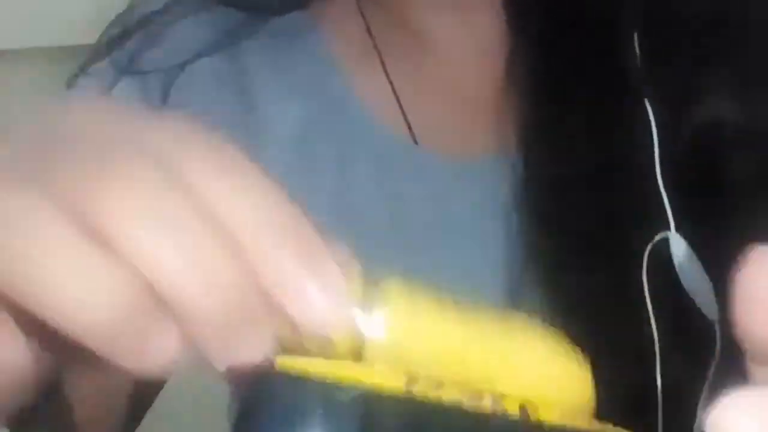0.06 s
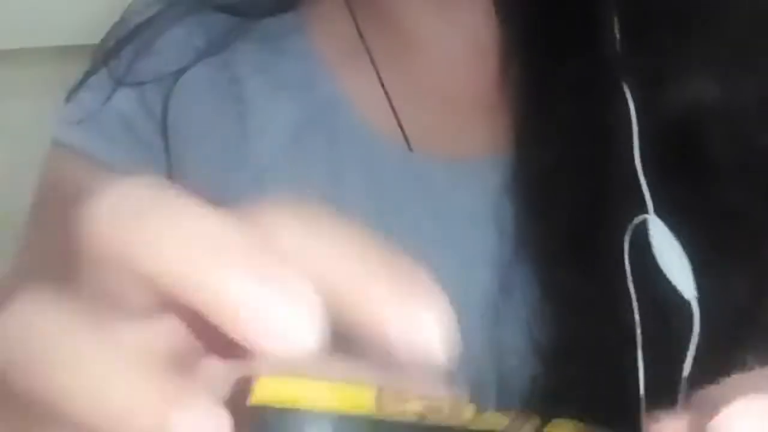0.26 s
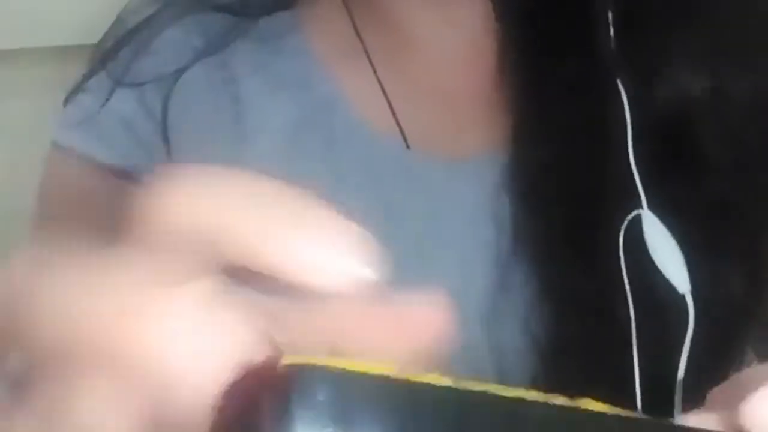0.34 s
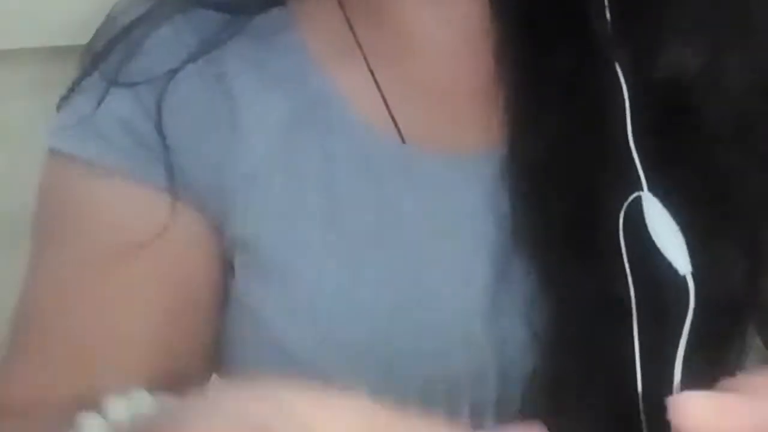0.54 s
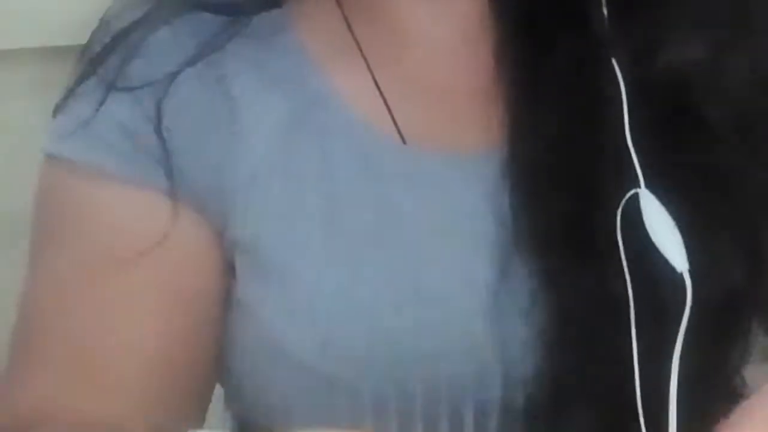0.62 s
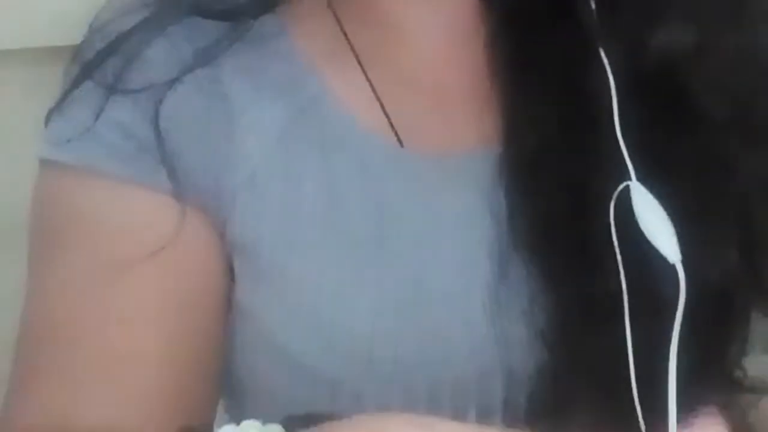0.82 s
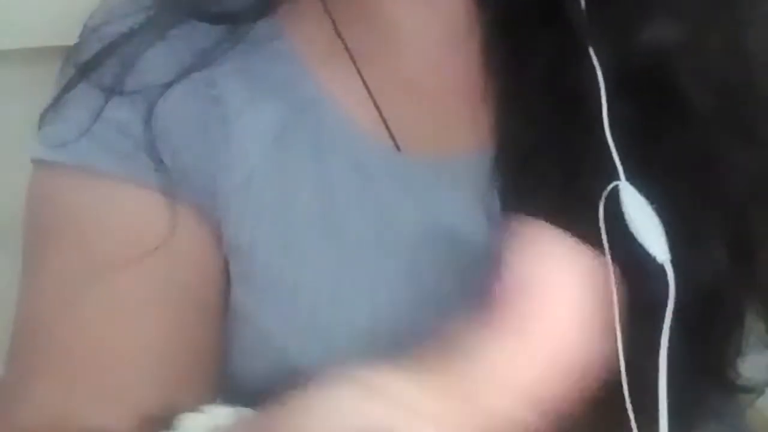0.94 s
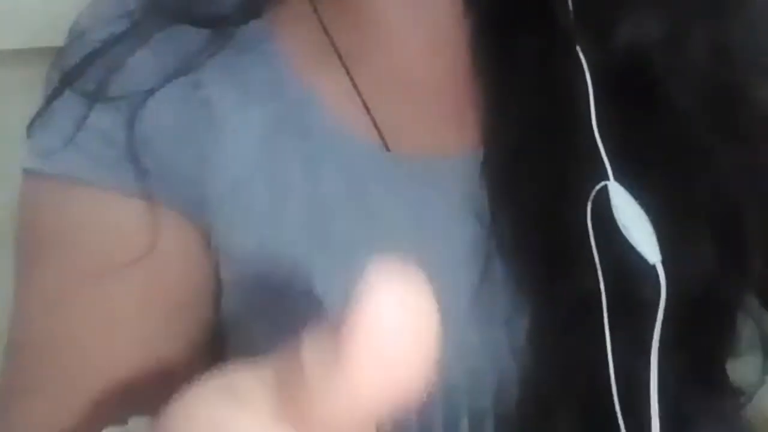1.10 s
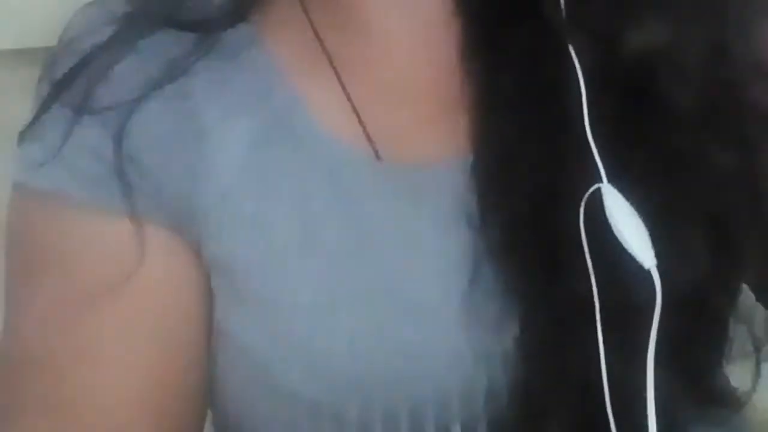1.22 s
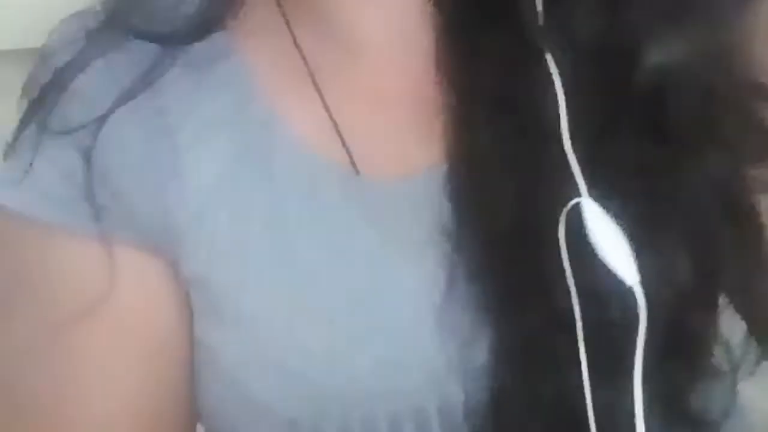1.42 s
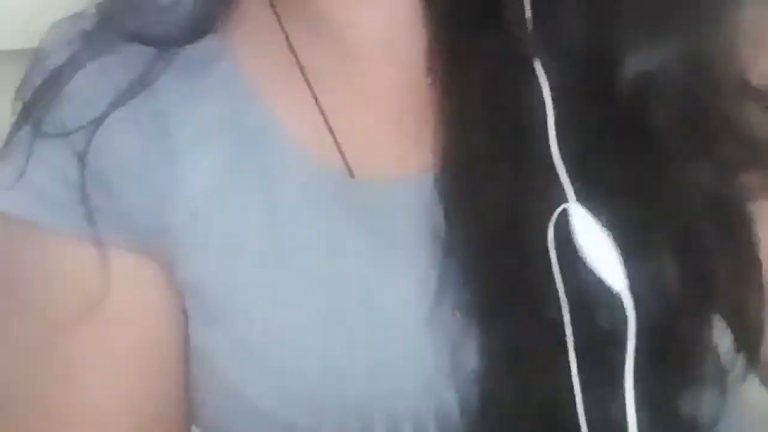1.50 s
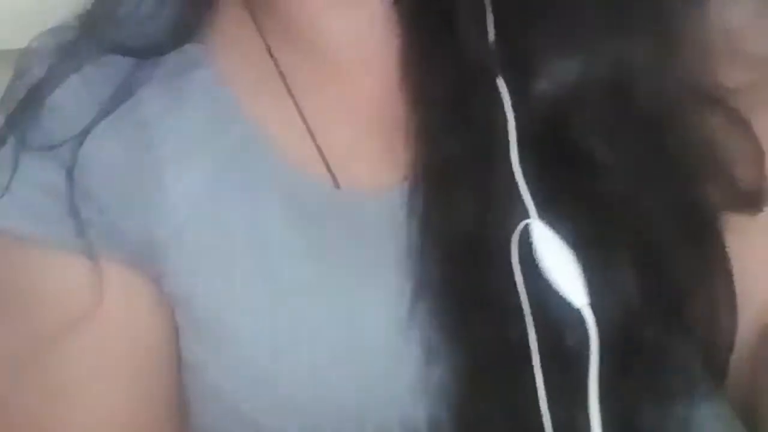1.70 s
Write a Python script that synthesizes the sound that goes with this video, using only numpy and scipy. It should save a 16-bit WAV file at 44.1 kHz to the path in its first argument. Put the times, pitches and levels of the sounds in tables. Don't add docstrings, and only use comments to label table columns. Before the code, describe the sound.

Light plastic tubes being set down and shuffled, with sharp clacks, small ticks and faint rubbing

```python
import sys
import numpy as np
from scipy import signal
from scipy.fft import rfft, irfft
from scipy.io import wavfile
from scipy.ndimage import uniform_filter1d

SR = 44100
rng = np.random.default_rng(int(sys.argv[2]) if len(sys.argv) > 2 else 0)


def attenuation_scalar(level_db):
    decades = np.asarray(level_db, float) / 20
    return 10 ** decades


def output_pcm(signal):
    pcm = np.clip(np.atleast_2d(signal).T, -1, 1) * 32767
    wavfile.write(sys.argv[1], SR, np.round(pcm).astype(np.int16))


N = 77175

# frequency in Hz, rms level in dB.
HUM = [(50, -63.5), (100, -71), (150, -72.5)]
# frequency in Hz, density in dB per Hz.
HISS_COLOUR = [(75, 6), (120, -1.5), (250, -0.5), (550, -7), (1000, -4.5), (1900, -18), (9000, -26),
               (15700, -34), (16100, -55)]
HISS_DB = -61.5

# delay in seconds, level in dB.
ECHOES = [
    (.0045, -19),
    (.016, -43),
    (.022, -23.5),
    (.031, -30),
]
# frequency in Hz, decay by 60 dB in seconds.
ROOM_T60 = [(200, 0.29), (600, 0.18), (1400, 0.22), (3700, 0.35), (9700, 0.33)]
# frequency in Hz, level in dB.
ROOM_COLOUR = [(200, -3), (900, 3.5), (2000, -5), (3200, -9.5), (6000, -6.5), (8000, -7.5), (14000, -13)]
ROOM_DB, ROOM_RISE_S = -13.5, 0.013

# time in seconds, level in dB.
FINGER_EFFORT = [(0, -75), (.24, -88), (.28, -55.5), (.4, -48.5), (.55, -93), (0.628, -56), (.67, -47.5),
                 (.76, -46.5), (.81, -47.5), (.97, -49), (1.2, -60), (1.428, -68), (1.465, -46.5),
                 (1.5, -56), (1.6, -61.5), (1.69, -66), (1.72, -53), (1.75, -55)]
# frequency in Hz, density in dB per Hz.
FINGER_COLOUR = [(150, -43), (500, -6), (900, -0.5), (1350, -2), (1900, -7), (2400, -9), (4500, -16),
                 (16000, -47)]
# time in seconds, level in dB.
SLIDE_EFFORT = [
    (0, -43.5),
    (.03, -48),
    (.066, -43.5),
    (.085, -52.5),
    (.098, -47.5),
    (.106, -60.5),
    (.14, -67),
]
# frequency in Hz, density in dB per Hz.
SLIDE_COLOUR = [(150, -20), (330, -7.5), (700, -11.5), (1300, 2), (1850, -4), (2400, -17), (3100, -14),
                (16000, -50.5)]
SLIPS_PER_S, SLIP_SPREAD_DB = 6000, 2.5

# start in seconds, level in dB, frequency in Hz.
THUMPS = [(0.2307, -24.5, 249), (0.244, -22.5, 164), (.258, -41, 210), (.272, -28, 190), (.285, -30, 172),
          (0.33, -40, 220), (.335, -35.5, 154), (1.29, -46, 170), (.420, -42, 170), (.465, -31, 360),
          (0.824, -37.5, 328), (.859, -25.5, 290), (1.492, -47, 139), (1.712, -42, 277)]
# frequency in Hz, density in dB per Hz.
RATTLE_COLOUR = [(60, -38), (150, 4.5), (300, 13), (600, 7), (1200, -36)]
THUMP_T60_S, RATTLE_DB, RATTLE_T60_S = 0.05, -12, 0.083

# start in seconds, level in dB, frequency in Hz, decay by 60 dB in seconds.
PINGS = [(.2445, -31.5, 2860, 0.0097), (.254, -36.5, 3800, 0.013), (.260, -37, 3770, .008),
         (.272, -36.5, 3350, 0.013), (.272, -43, 5030, .01), (.319, -24.5, 3810, 0.0096),
         (.319, -22, 2720, 0.0058), (.335, -33, 3020, 0.011), (.412, -23.5, 1276, 0.025),
         (.412, -31.5, 4720, 0.0077), (.413, -39, 2880, 0.013), (.465, -21, 5090, 0.0083),
         (.465, -20.5, 6350, 0.0031), (.4655, -20, 1333, 0.026), (.466, -26.5, 2915, 0.014),
         (.480, -32, 3220, 0.011), (.574, -40, 5130, 0.0099), (.595, -34.5, 5150, 0.01),
         (.695, -19, 3240, 0.016), (.708, -28.5, 880, 0.018), (.7135, -24, 980, 0.017),
         (.716, -30, 1810, 0.017), (.720, -26.5, 1210, 0.014), (.730, -32, 1090, 0.013),
         (.739, -30, 1520, 0.016), (.751, -45, 1200, 0.023), (.787, -32, 1290, 0.018),
         (.823, -17, 5040, .008), (.823, -18, 2370, 0.016), (.823, -37, 6410, 0.0072),
         (.843, -21.5, 1160, 0.032), (.8597, -12, 4270, 0.01), (.859, -14, 2750, .012),
         (.8594, -15, 4950, 0.0083), (.859, -19, 10550, 0.01), (.859, -26, 6500, 0.0052),
         (.882, -31, 5100, .015), (.893, -28, 5500, 0.005), (1.0692, -13, 2540, 0.011),
         (1.0715, -22, 5560, 0.016), (1.0695, -30, 8750, 0.01), (1.103, -27.5, 1013, 0.028),
         (1.4435, -31, 3250, .011), (1.4435, -35.5, 4300, 0.011), (1.447, -44, 670, 0.058),
         (1.461, -40, 1200, 0.017), (1.465, -33.5, 1470, 0.016), (1.475, -41, 1980, 0.017),
         (1.496, -44, 2000, 0.022), (1.719, -49, 2360, 0.044)]
# start in seconds, level in dB,
# frequency in Hz, decay by 60 dB in seconds.
FURTHER_MODES = [(.2445, -41, 2050, 0.037), (.3193, -19, 1497, 0.01), (.468, -34.5, 700, 0.049),
                 (.695, -17.5, 1900, 0.016), (.823, -8.5, 1590, 0.01), (.8598, -13.5, 1460, 0.0089),
                 (.863, -19.5, 900, 0.011), (.893, -30, 1200, 0.0093), (1.0692, -9.5, 3460, 0.0086),
                 (1.072, -23.5, 6560, 0.011), (1.092, -31, 790, 0.13), (1.138, -35.5, 790, 0.11),
                 (1.4435, -29.5, 1650, 0.014), (.576, -45, 780, 0.073), (1.478, -42, 3300, 0.011),
                 (.5945, -41, 3000, .012), (.5745, -42, 2340, .008), (.539, -43, 3300, .01),
                 (.648, -33, 580, 0.016), (1.0485, -19.5, 2500, 0.0088)]
PING_ROOM_DB = -4

# start in seconds, peak level in dB, wall mode in Hz, hollow body
# relative level in half dB, crack relative level in half dB.
KNOCKS = [(0.2439, -22, 1340, -7, -23.5), (.319, -18.5, 1120, -19, -13.5), (0.412, -25.5, 1253, -12, -12),
          (0.4646, -21.5, 1305, 4, -5), (0.573, -27, 1124, -10, -17), (0.5949, -30, 1160, -9, -12),
          (.651, -24, 800, -11, -17), (0.654, -21, 1298, -37, -21.5), (0.6952, -13.5, 1260, -15.5, -13),
          (.779, -28.5, 1220, 6.5, -22), (0.823, -8.5, 1163, -12, -12.5), (0.8587, -14, 553, -50, 7.5),
          (0.8925, -25.5, 1030, -27, 3), (.995, -28.5, 667, -18, -19), (1.048, -19, 1504, -5, -17),
          (1.0694, -26, 980, -46, 12), (1.0712, -10, 1025, -38, -28), (1.4435, -30, 1390, -8, -12),
          (1.7, -40.5, 1010, -37, -7), (1.703, -30, 956, -17, -36), (1.713, -33.5, 1030, -28, -40),
          (0.334, -39, 1040, -12, -5), (.821, -19, 1010, -14, -39)]
# start in seconds, peak level in dB, wall mode in Hz, hollow body relative level in half dB, crack relative
# level in half dB.
MORE_KNOCKS = [(.254, -28, 1240, -5, -13), (.260, -28, 1240, -20, -16), (.271, -26, 1166, -66, -19),
               (.343, -29, 1020, -1, -10), (.480, -22.5, 1040, -49, -18.5), (.534, -37.5, 1230, -39, -7),
               (.539, -38, 1250, -16, -7.5), (.639, -35, 1010, -8, -13), (.663, -23, 1196, -9, -23),
               (.691, -25.5, 1017, -28, -9.5), (0.808, -47, 1220, -32, 11), (.953, -32.5, 670, -13, -25.5),
               (1.010, -28.5, 650, -16, -15), (1.030, -30, 860, -20, -13), (1.055, -23, 2310, -19, -16),
               (1.0817, -20, 1084, -15, -28), (1.0789, -24.5, 2840, -26, -3), (1.090, -17.5, 810, -39, -28),
               (1.227, -50.5, 670, -26, -26.5), (1.253, -36.5, 780, -42, -37), (1.278, -42.5, 1008, -40, -20),
               (1.342, -59.5, 940, -28, 13), (1.569, -45.5, 700, -29, -14), (1.588, -45.5, 2080, -12, -12),
               (1.719, -38, 1134, -21, -18)]
# frequency in Hz, density in dB per Hz.
CRACK_COLOUR = [(500, -7), (1800, 3), (3000, 3.5), (5000, -4.5), (7500, -12.5), (10500, -16), (14000, -20),
                (17000, -32)]
# frequency in Hz, level in dB.
SHELL_MODES = [(2600, -5), (3400, -0.5), (4500, -5.5), (5200, -16), (6700, -7.5), (10600, -26)]
CONTACT_S = 0.00058
SHELL_T60_S, SHELL_SCATTER_DB = 0.0058, 0.5
WALL_DB, WALL_T60_S = 2, 0.018
BODY_HZ, BODY_T60_S = 670, 0.018
CRACK_DB, CRACK_ROOM_DB = -2, 1.5
SNAP_T60_S, LINGER_DB, LINGER_T60_S = 0.012, -8, 0.03
TILT_PER_DB, DULL_RISE = 0.1964, 0.038

LOW_CUT_HZ, EDGE_HZ = 179, 16550


def evened(x):
    return x / np.sqrt(np.mean(x ** 2) + 1e-20)


def read(points, hz):
    f, value = np.transpose(points)
    return np.interp(np.log(hz + 1), np.log(f + 1), value)


def add(mix, s, sound):
    part = mix[round(s * SR):][:len(sound)]
    part += sound[:len(part)]


def ring(hz, t60, t):
    return np.sin(2 * np.pi * hz * t) * attenuation_scalar(-60 * t / t60)


def coloured(x, points):
    gain = attenuation_scalar(read(points, np.fft.rfftfreq(len(x), 1 / SR)))
    return irfft(rfft(x) * gain, len(x))


def floor():
    t = np.arange(N) / SR
    hum = sum(attenuation_scalar(db) * np.sqrt(2) * np.sin(2 * np.pi * hz * t + 6 * rng.random()) for hz, db in HUM)
    rumble_cut = signal.butter(3, 75, "high", fs=SR, output="sos")
    hiss = signal.sosfilt(rumble_cut, rng.standard_normal(N))
    return hum + attenuation_scalar(HISS_DB) * evened(coloured(hiss, HISS_COLOUR))


def room(x):
    taps = np.zeros(SR // 2)
    at = np.arange(100, len(taps) - 20, 20)
    at = at + rng.integers(0, 20, len(at))
    taps[at] = rng.choice([-1., 1.], len(at))
    hz, t, z = signal.stft(taps, SR, nperseg=256)
    decay_db = -60 * t / read(ROOM_T60, hz)[:, None]
    z = z * attenuation_scalar(read(ROOM_COLOUR, hz)[:, None] + decay_db)
    tail = signal.istft(z, SR, nperseg=256)[1]
    tail = tail * np.minimum(np.arange(len(tail)) / SR / ROOM_RISE_S, 1) ** 2
    tail = attenuation_scalar(ROOM_DB) * tail / np.linalg.norm(tail)
    for s, db in ECHOES:
        add(tail, s, attenuation_scalar(db) * np.array([0.25, 0.5, 0.25]))
    return signal.fftconvolve(x, tail)[:N]


def rub(effort, colour):
    strength = attenuation_scalar(SLIP_SPREAD_DB * np.minimum(rng.exponential(1, N), 3))
    slips = strength * (rng.random(N) < SLIPS_PER_S / SR) * rng.choice([-1., 1.], N)
    lumps = attenuation_scalar(0.65 * evened(uniform_filter1d(rng.standard_normal(N), size=200)))
    slips = evened(lumps * coloured(slips, colour))
    s, db = np.transpose(effort)
    return slips * attenuation_scalar(np.interp(np.arange(N) / SR, s, db, right=-99))


def thump(db, hz):
    t = np.arange(6000) / SR
    rattle = evened(coloured(rng.standard_normal(len(t)), RATTLE_COLOUR))
    rattle = attenuation_scalar(RATTLE_DB - 60 * t / RATTLE_T60_S) * rattle
    rise = np.minimum(t / 0.0009, 1)
    return attenuation_scalar(db) * (ring(hz, THUMP_T60_S, t) + rattle) * rise


def ping(db, hz, t60):
    t = np.arange(6000) / SR
    mode = attenuation_scalar(db) * ring(hz, t60, t) * np.minimum(t / CONTACT_S, 1)
    return mode, attenuation_scalar(PING_ROOM_DB) * mode


def knock(db, hz, body_db, crack_db):
    t = np.arange(2600) / SR
    tilt = TILT_PER_DB * (crack_db + 4.5)
    colour = [(f, d + tilt * np.log2(f / 3000)) for f, d in CRACK_COLOUR]
    rise = np.minimum(t / CONTACT_S / (1.5 + DULL_RISE * max(-crack_db, 0)), 1)

    noise = evened(coloured(rng.standard_normal(len(t)), colour))
    noise = noise * (attenuation_scalar(-60 * t / SNAP_T60_S) + attenuation_scalar(LINGER_DB - 60 * t / LINGER_T60_S))
    luck = SHELL_SCATTER_DB * rng.standard_normal(len(SHELL_MODES))
    shell = sum(attenuation_scalar(d + b) * ring(f, SHELL_T60_S, t) for (f, d), b in zip(SHELL_MODES, luck))
    crack = rise * (shell + noise)

    click = coloured(1. * (np.arange(len(t)) == 100), colour)
    click = attenuation_scalar(CRACK_ROOM_DB) * click * np.linalg.norm(crack) / np.linalg.norm(click)

    t60 = WALL_T60_S * min(1300 / hz, 1)
    wall = ring(hz, t60, t) + 0.5 * ring(1.301 * hz, t60, t) + 0.27 * ring(0.858 * hz, t60, t)
    body = attenuation_scalar(0.5 * body_db) * ring(BODY_HZ, BODY_T60_S, t)
    soft = rise * (attenuation_scalar(WALL_DB) * wall + body)
    hard = attenuation_scalar(CRACK_DB + 0.5 * crack_db)
    return attenuation_scalar(db) * (soft + hard * crack), attenuation_scalar(db) * (soft + hard * click)


def scene():
    near, far = np.zeros((2, N))
    for s, *push in THUMPS:
        sound = thump(*push)
        add(near, s, sound)
        add(far, s, sound)
    for rows, source in ((PINGS, ping), (FURTHER_MODES, ping), (MORE_KNOCKS, knock), (KNOCKS, knock)):
        for s, *contact in rows:
            heard, sent = source(*contact)
            add(near, s, heard)
            add(far, s, sent)
    low_cut = signal.butter(2, LOW_CUT_HZ, "high", fs=SR, output="sos")
    near, far = signal.sosfilt(low_cut, [near, far])
    friction = rub(FINGER_EFFORT, FINGER_COLOUR) + rub(SLIDE_EFFORT, SLIDE_COLOUR)
    return (floor() + room(far) + friction + near)[None]


def band_limit(x):
    return signal.sosfilt(signal.butter(12, 16840, fs=SR, output="sos"), x)


def record(dry):
    low_pass = signal.firwin(511, EDGE_HZ, window=("kaiser", 9), fs=SR)
    mix = signal.oaconvolve(dry, low_pass[None], "same")
    return band_limit(mix)


dry = scene()
out = record(dry)
output_pcm(out)
```